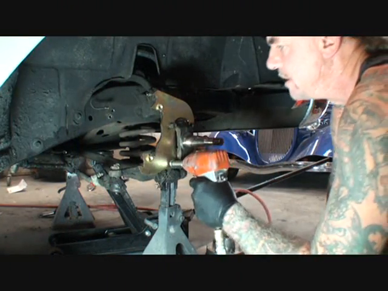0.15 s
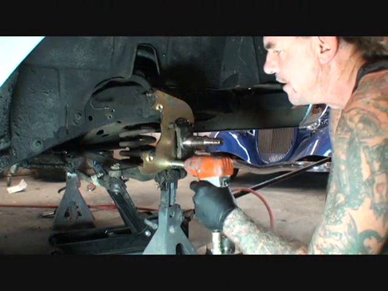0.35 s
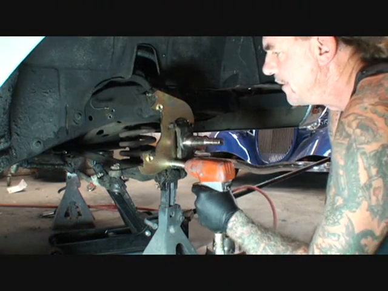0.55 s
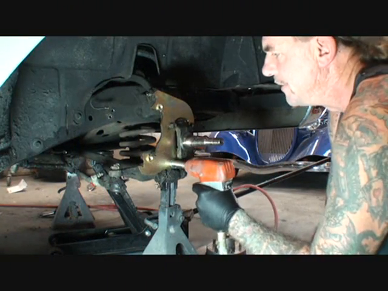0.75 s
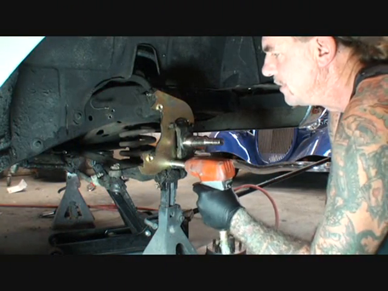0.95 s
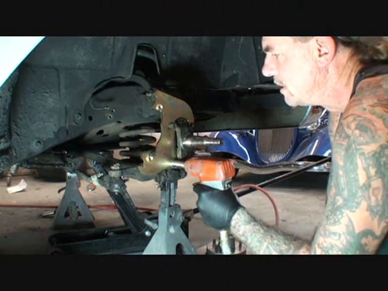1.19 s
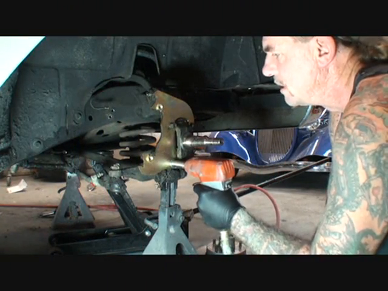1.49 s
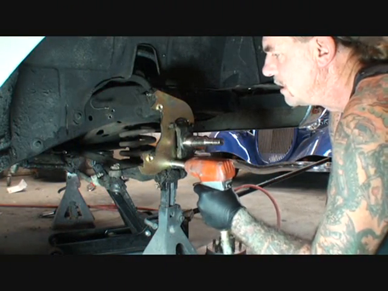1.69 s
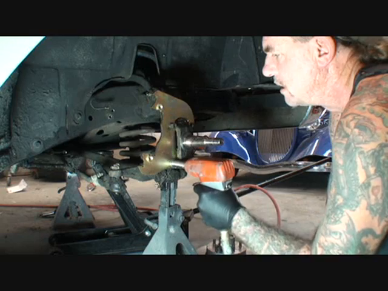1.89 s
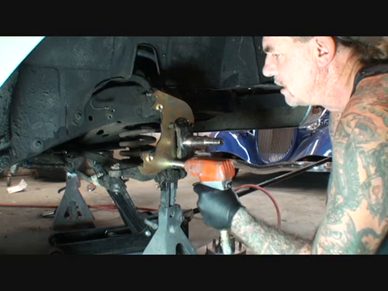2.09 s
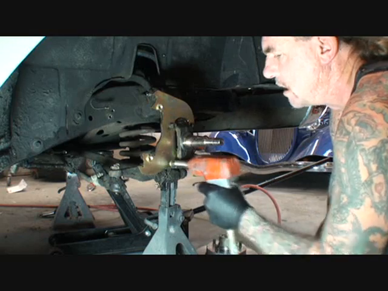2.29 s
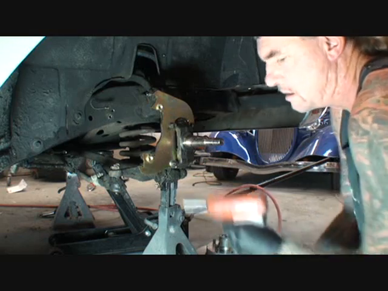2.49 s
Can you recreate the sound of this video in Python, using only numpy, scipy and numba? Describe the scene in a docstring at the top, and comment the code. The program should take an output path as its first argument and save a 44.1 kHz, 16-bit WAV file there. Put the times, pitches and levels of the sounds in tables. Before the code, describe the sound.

An air impact wrench on a car's suspension: a few light socket knocks on the nut, then a loud, rapid metallic hammering with hissing exhaust air, stopping abruptly into short garage reverberation, close and compressed.

```python
"""An air wrench tightens a bolt on a car's suspension in a garage: its hammer strikes twice a turn, each blow
a noise burst that also drives the damped modes of socket and bracket, while the motor puffs, hisses and whirrs.
Before this the socket knocks onto the nut, in short noise bursts with a steel ring; more knocks come near the end.
Body panels and garage answer by convolution with decaying noise, and filtered noise makes the air line's
faint, constant hiss. The recorder's gain control and limiter flatten the blows."""
import sys
import numpy as np
from scipy import signal
from scipy.fft import rfft, irfft
from scipy.io import wavfile
from scipy.ndimage import uniform_filter1d, minimum_filter1d
from numba import njit

SR = 44100
rng = np.random.default_rng(int(sys.argv[2]) if len(sys.argv) > 2 else 0)


def transcribe(signal):
    """Save signal, clipped to [-1, 1], as a 16-bit WAV file at the path in sys.argv[1]."""
    frames = np.atleast_2d(signal).T
    limited = np.clip(frames, -1, 1)
    pcm = np.round(limited * 32767).astype(np.int16)
    wavfile.write(sys.argv[1], SR, pcm)


N = 116865
T = np.arange(N) / SR
FREQS = np.maximum(np.arange(N + 1) * SR / (2 * N), 1)  # bins of a spectrum of 2 N samples, Hz

# force of the blows, which sags while the nut slips round: [t/s, relative level/dB]
BLOW_FORCE = [(.66, 8.5), (.69, 1.5), (.85, 1.5), (.89, -12), (.935, -18), (.95, 1), (1.6, -2.5),
              (2.325, -3), (2.35, -20), (2.39, -31)]
# modes of socket and bracket:
# [f/Hz, t60/s, relative level on the main blow/dB, relative level on the second blow/dB]
STEEL_MODES = [(1651, .06, -14, -15), (2135, .06, -8, -10), (2326, .07, 0, -3), (2443, .05, -3, -5),
               (2580, .08, -3, -5), (2880, .05, -1, -4), (3090, .05, -5, -6), (3522, .07, -10, -14),
               (4347, .05, -7, -6), (4590, .06, -7, -3), (4793, .07, -6, -3), (7600, .022, 2, -22),
               (8300, .03, 0, 1), (10900, .02, -16, 0)]


def undb(db):
    """Amplitude ratio: 20 dB is a factor of ten."""
    return 10 ** (np.asarray(db) / 20)


def unit(x):
    """Normalisation: scale to rms 1."""
    return x / np.sqrt(np.mean(x ** 2))


def curve(rows):
    """Linear interpolation in time between (t/s, value) rows."""
    return np.interp(T, *np.array(rows, float).T)


def noise(colour, scale=1):
    """Spectral shaping: Gaussian noise of rms 1 follows a (f/Hz, dB per Hz) colour with f multiplied by scale."""
    hz, db = np.array(colour, float).T
    gain = undb(np.interp(np.log(FREQS), np.log(hz * scale), db))
    white = rfft(rng.standard_normal(2 * N))
    return unit(irfft(white * gain)[:N])


def fade(t60):
    """Exponential decay: the level falls 60 dB in t60 seconds."""
    return np.exp(-np.log(1000) * T / max(t60, np.finfo(np.float32).eps))


def convolve(x, response):
    """Linear system: the output is the input convolved with the impulse response."""
    return signal.fftconvolve(x, response)[:N]


def pulses(times, sizes):
    """Impulsive excitation: one single-sample click at each time."""
    return np.bincount((np.asarray(times) * SR).astype(int), sizes, N)


def bursts(times, sizes, t60):
    """Impact envelope: a 1 ms rise at each time, then exponential decay."""
    sharp = convolve(pulses(times, sizes), fade(t60))
    return uniform_filter1d(sharp, size=max(int(.001 * SR), 1))


def ring(push, modes, column=2):
    """Modal synthesis: a push excites damped sines (f/Hz, t60/s, dB, ..), with levels from the given column."""
    response = sum(undb(row[column]) * fade(row[1]) * np.sin(2 * np.pi * row[0] * T) for row in modes)
    return convolve(push, response)


def each_turn(share, strength, scatter_db):
    """Cyclic excitation: times and sizes of an event at a given share of every turn, with random scatter."""
    # rotation of the hammer: [t/s, turns made]
    rotation = [(.662, 0), (.719, 1), (.865, 4), (.951, 6), (1.0, 7), (1.186, 11), (1.424, 16), (1.66, 21),
                (1.799, 24), (2.083, 30), (2.171, 32), (2.311, 35), (2.41, 37)]
    jitter_s = 0.00037  # standard deviation
    s, turns = np.array(rotation).T
    chance = rng.standard_normal((int(turns[-1]), 2))
    times = np.interp(np.arange(len(chance)) + share, turns, s) + jitter_s * chance[:, 0]
    level_db = np.interp(times, *np.array(strength).T) + scatter_db * chance[:, 1]
    return times, undb(level_db)


def air_line():
    """Turbulent flow: steady broadband noise hisses from the air line."""
    # colour of the hiss: [f/Hz, relative level/dB per Hz]
    leak_colour = [(18, -43), (30, -21), (192, -13.5), (399, -14), (830, -9.5), (945, -11), (1400, -12),
                   (2550, -4.5), (3490, -7), (3780, -2.5), (4310, -6), (8500, -2.5), (15500, -12.5)]
    return undb(-37.5) * noise(leak_colour)


def knocks():
    """Impact excitation: each knock of socket on nut is a noise burst and a chatter that rings the steel modes."""
    # single knocks: [t/s, knock level/dB, centre f/Hz, extra level of the low end/dB, relative ring level/dB]
    contacts = [(0.24, -21, 2850, -3, -46), (0.2445, -16.5, 3080, -9, -49), (0.247, -15, 1750, -9, -50),
                (.2615, -25, 1750, 5, -39), (0.2847, -27.5, 1740, 1, -49), (0.293, -26.5, 2930, 3, -63),
                (0.4078, -17, 2820, -13, -44.5), (0.409, -25, 2960, 3, -43), (.498, -17, 4640, -26, -36),
                (0.4982, -7.5, 2640, -14, -47), (0.501, -13, 2350, -14, -52), (2.255, -6, 1270, -1, -48),
                (2.265, 2, 3100, -9, -45), (2.362, -17, 7500, 1, -50)]
    # colour of a knock: [multiple of the centre f, relative level/dB per Hz]
    knock_colour = [(.06, -1), (.25, -14), (.5, -2), (.8, -11.5), (1, 3), (1.3, -12), (1.8, -13),
                    (2.6, -37), (6, -31)]
    knock_t60_s, skid_t60_s = 0.037, 0.0097
    clack = 0
    for s, db, hz, low_db, _ in contacts:
        colour = [(multiple, level + low_db * (multiple < 2 / np.pi)) for multiple, level in knock_colour]
        clack = clack + bursts([s], [undb(db)], knock_t60_s) * noise(colour, hz)
    # the socket chatters briefly as it lands
    s, *_, ring_db = np.array(contacts).T
    skid = bursts(s, undb(ring_db), skid_t60_s) * rng.standard_normal(N)
    soft_skid = uniform_filter1d(skid, size=5)  # a short average dulls the treble
    return clack + undb(-4) * ring(soft_skid, STEEL_MODES)


def panels(x):
    """High modal density: the many close modes of the body panels blur into a low, fading boom."""
    # colour of the panels' slow ringing: [f/Hz, relative level/dB per Hz]
    panel_colour = [(100, -25), (260, -2), (330, -6), (450, 1), (600, -1.5), (800, -5.5), (1100, -7.5),
                    (2000, -28)]
    response = noise(panel_colour) * fade(0.79)  # t60 in s
    return convolve(x, response / np.linalg.norm(response))


def garage(x):
    """Diffuse reverberation: a noise tail whose frequency bands each decay at their own rate."""
    # reverberation bands: [f/Hz, t60/s, level/dB]
    bands = [(185, 1.1, 1.5), (585, 0.71, -9), (1390, 0.19, -6.5), (3780, 0.8, -10), (7860, 0.56, -9),
             (14300, 0.36, -23.5)]
    first_echo_s = 0.0086
    hz, t60, db = np.array(bands, float).T
    white, tail = rfft(rng.standard_normal(2 * N)), 0
    # each band has full weight at its own frequency and none at its neighbours'
    for weights, seconds, gain in zip(np.eye(len(hz)), t60, undb(db)):
        decay = fade(seconds) * (T > first_echo_s)
        band = irfft(white * np.interp(np.log(FREQS), np.log(hz), weights))[:N]
        tail = tail + gain * band * decay / np.linalg.norm(decay)
    return convolve(x, tail)


def exhaust():
    """Pulsed flow: puffs in step with the hammer excite the muffler's resonances, over the jet's turbulent hiss."""
    # air through the motor: [t/s, relative level/dB]
    flow = [(.6, -57), (.655, -31), (.665, -17), (.73, 7.5), (.82, 9.5), (.89, 3), (.95, 4.5), (1.6, 5.5),
            (2.33, 1), (2.39, -10.5), (2.44, -21.5)]
    # puffs as the motor picks up after each main blow: [share of a turn, relative level/dB]
    puff_phases = [(.13, -3.5), (.29, -2), (.7, -13.5), (0.868, -1.5)]
    # resonances of the exhaust: [f/Hz, t60/s, relative level/dB]
    muffler = [(429, 0.09, -6), (523, 0.054, 8), (700, 0.059, 5.5), (920, 0.036, -1)]
    # colour of the puffs' noise: [f/Hz, relative level/dB per Hz]
    puff_colour = [(30, -30), (100, -30), (180, -15), (300, -38), (400, -3), (540, -1), (680, 6),
                   (850, -10.5), (1300, 6.5), (3000, -16)]
    # colour of the jet: [f/Hz, relative level/dB per Hz]
    jet_colour = [(100, -33), (300, -35), (550, -24), (900, -3.5), (1600, -2), (2400, 10.5), (3600, 5),
                  (4700, 9), (6000, 0.5), (8300, 1.5), (11000, -0.5), (15500, -15)]
    scatter_db, puff_t60_s = 0.33, 0.057
    puffs = [(each_turn(share, flow, scatter_db), undb(db)) for share, db in puff_phases]
    pops = ring(sum(gain * pulses(*puff) for puff, gain in puffs), muffler)
    gusts = sum(gain * bursts(*puff, puff_t60_s) for puff, gain in puffs) * noise(puff_colour)
    puffing = undb(-25) * (unit(pops) + undb(4) * unit(gusts))
    # the jet weakens with the flow and, half as much in dB, with the force of the blows
    jet = undb(np.minimum(curve(flow), 0) + np.minimum(curve(BLOW_FORCE), 0) / 2)
    return puffing + undb(-5.5) * jet * noise(jet_colour)


def hammer():
    """Impact and resonance: two blows a turn each give a crack, a broad clash and a noisy push on the steel modes."""
    # colour of the main blow's clash: [f/Hz, relative level/dB per Hz]
    main_colour = [(200, -108), (500, -26), (1000, -4.5), (1700, 6), (2500, 11), (3600, 7), (5200, 5.5),
                   (6000, 4.5), (7000, 5.5), (8200, 7), (10000, -2.5), (12500, -7.5), (15500, -10.5)]
    # colour of the second blow's clash: [f/Hz, relative level/dB per Hz]
    second_colour = [(200, -24), (500, 6), (1000, -6), (1700, -4), (2500, 11.5), (3600, 14), (5200, 19),
                     (6000, 18), (7000, 11), (8200, 13.5), (10000, 18.5), (12500, 7.5), (15500, 7.5)]
    # colour of the crack that opens each blow: [f/Hz, relative level/dB per Hz]
    crack_colour = [(500, -35), (3000, -5), (6500, -9), (7900, 1.5), (9500, 0), (11000, -5), (15500, -15)]
    main_t60_s, second_t60_s, crack_t60_s, contact_t60_s = 0.15, 0.08, .03, 0.026
    main = each_turn(0, BLOW_FORCE, scatter_db=5)
    second = each_turn(.49, BLOW_FORCE, scatter_db=3.5)
    main_clash = undb(-7) * unit(bursts(*main, main_t60_s) * noise(main_colour))
    second_clash = undb(-11.5) * unit(bursts(*second, second_t60_s) * noise(second_colour))
    crack = (bursts(*main, crack_t60_s) + bursts(*second, crack_t60_s)) * noise(crack_colour)
    # the contact chatters, so the push is a noise burst
    main_push = bursts(*main, contact_t60_s) * rng.standard_normal(N)
    second_push = bursts(*second, contact_t60_s) * rng.standard_normal(N)
    steel = ring(main_push, STEEL_MODES) + ring(second_push, STEEL_MODES, column=-1)
    return main_clash + second_clash + undb(-13) * unit(crack) + undb(-8.5) * unit(steel)


def racing():
    """Unloaded motor: it races while the nut slips, heard as a swell of coloured noise."""
    # level of the whirr: [t/s, level/dB]
    race = [(0.822, -45), (0.857, -7), (.89, -10), (.92, -12), (.95, -42)]
    # colour of the whirr: [f/Hz, relative level/dB per Hz]
    race_colour = [(200, -32), (480, -37), (780, 6), (1100, -13), (2500, -1), (4200, 0), (5100, 4),
                   (6000, -7), (12000, -35)]
    s, db = np.array(race).T
    return np.interp(T, s, undb(db), left=0, right=0) * noise(race_colour)


def scene():
    """Superposition: wrench, knocks, panels and room add up, thinned in the bass, over the air line's hiss."""
    bass_cut_hz = 504
    wrench, taps = hammer() + exhaust() + racing(), knocks()
    body = panels(undb(-13) * taps + undb(-19) * wrench)
    tool = wrench + taps + body + garage(wrench + undb(-4.5) * taps)
    high_pass = signal.butter(2, bass_cut_hz, "high", fs=SR, output="sos")
    return (signal.sosfilt(high_pass, tool) + air_line())[None]


@njit
def follow(x, attack, release):
    """First-order smoothing: the level estimate rises fast and falls slowly."""
    out, e = np.empty(len(x)), 0.
    for i in range(len(x)):
        e += (x[i] - e) * (attack if x[i] > e else release)
        out[i] = e
    return out


def record(dry):
    """Dynamic range compression: slow gain control, a fast look-ahead limiter and a treble cut-off."""
    agc_top_db, attack_s, release_s = -9.5, 0.017, 1.3
    # the limits on rms level and on peak amplitude hold ahead of the output gain
    limit_db, peak_limit, lookahead_s, out_db = -15.5, .68, 0.0023, 4
    top_hz = 15800
    tiny = np.finfo(float).eps
    loud = np.sqrt(np.abs(uniform_filter1d(dry[0] ** 2, size=88))) + tiny  # rms over 2 ms
    level = follow(loud, 1 / (attack_s * SR), 1 / (release_s * SR))
    slow = np.minimum(1, undb(agc_top_db) / level)
    ahead = max(int(lookahead_s * SR), 1)
    allowed = np.minimum(undb(limit_db) / loud, peak_limit / (np.abs(dry[0]) + tiny)) / slow
    # hold the lowest gain nearby, then smooth it
    held = minimum_filter1d(np.minimum(1, allowed), 2 * ahead)
    fast = uniform_filter1d(held, ahead)
    low_pass = signal.ellip(10, .1, 90, top_hz, fs=SR, output="sos")
    return signal.sosfilt(low_pass, dry * slow * fast * undb(out_db))


dry = scene()
out = record(dry)
transcribe(out)
```